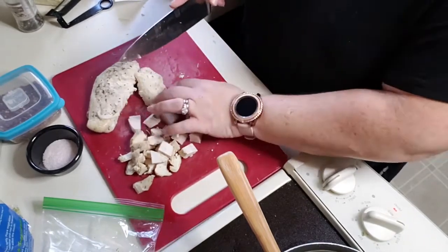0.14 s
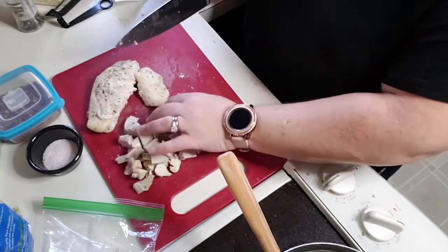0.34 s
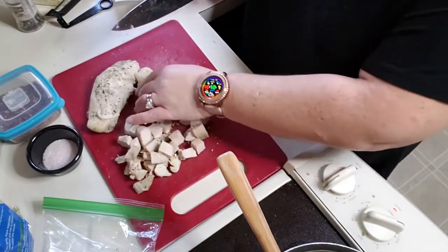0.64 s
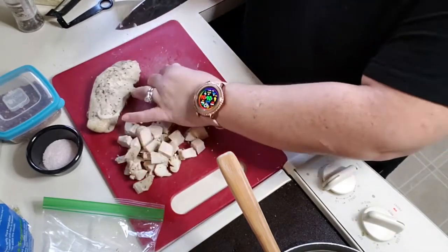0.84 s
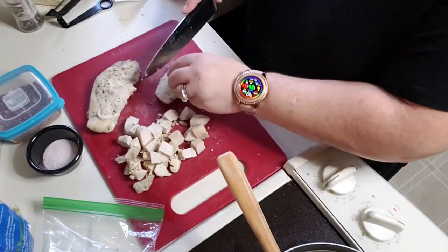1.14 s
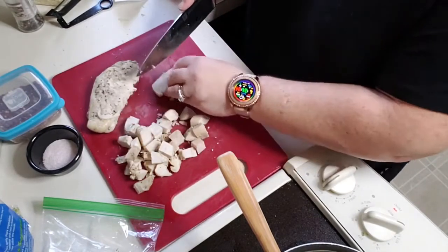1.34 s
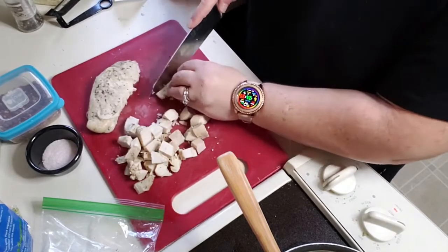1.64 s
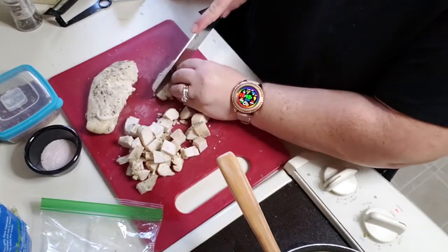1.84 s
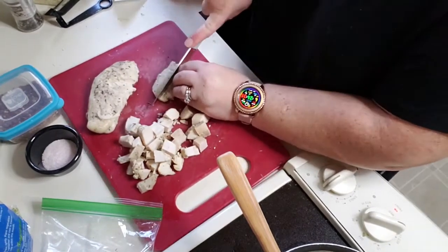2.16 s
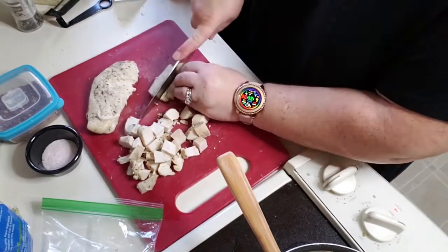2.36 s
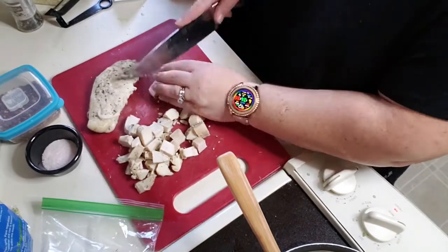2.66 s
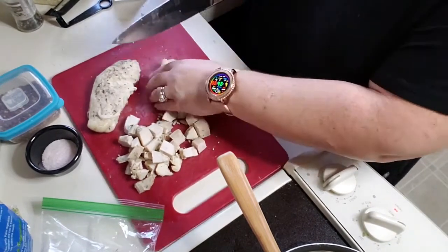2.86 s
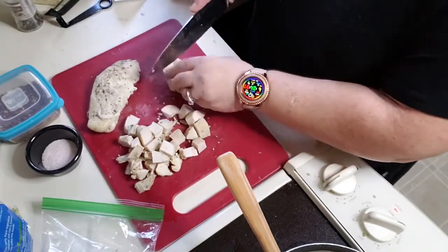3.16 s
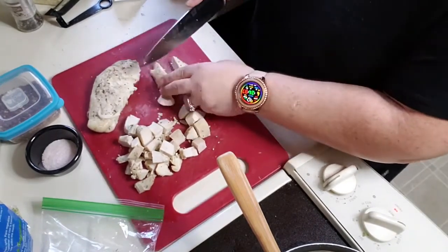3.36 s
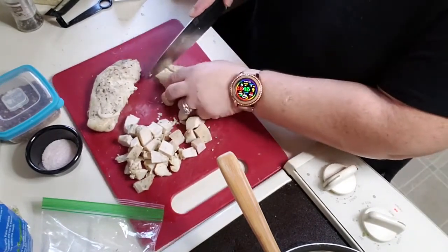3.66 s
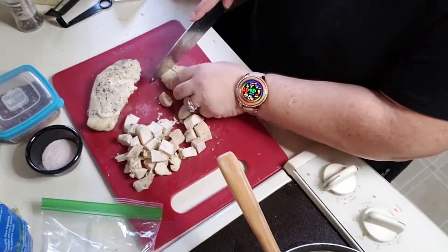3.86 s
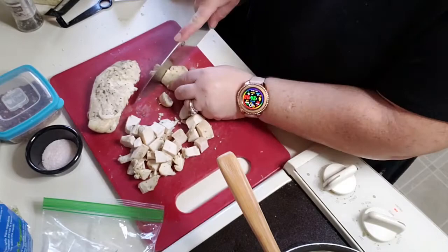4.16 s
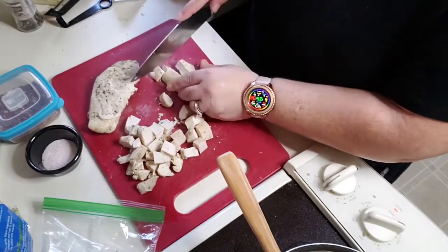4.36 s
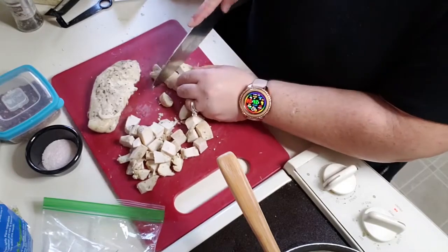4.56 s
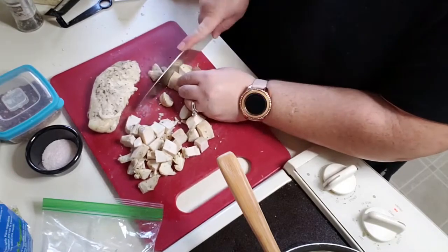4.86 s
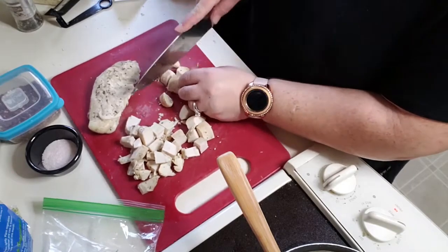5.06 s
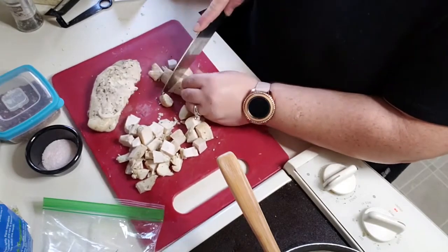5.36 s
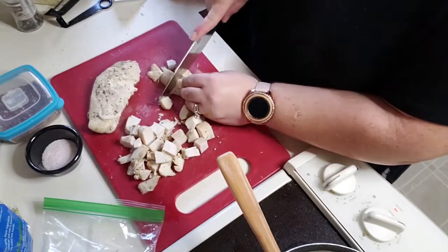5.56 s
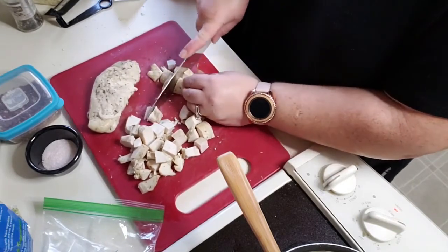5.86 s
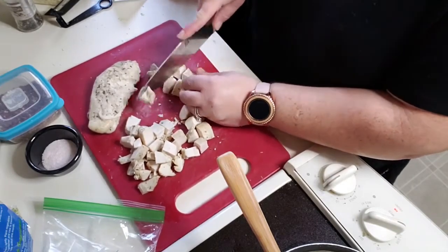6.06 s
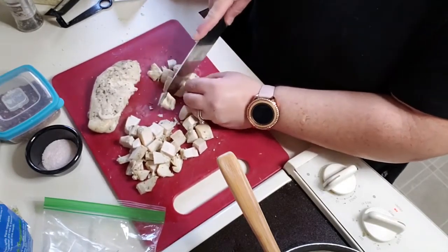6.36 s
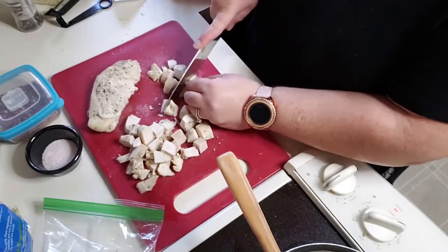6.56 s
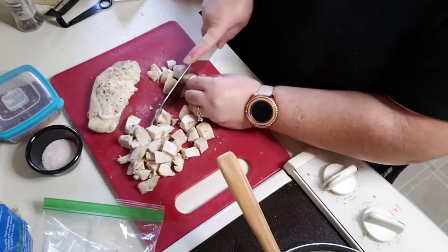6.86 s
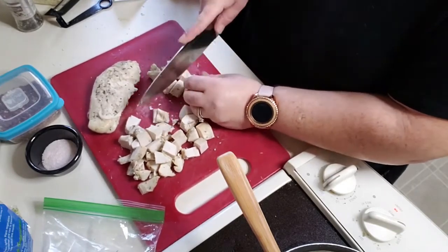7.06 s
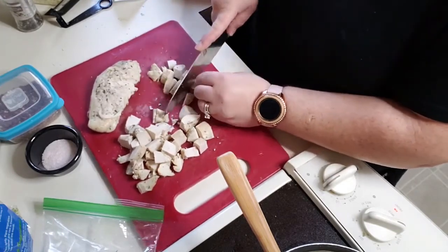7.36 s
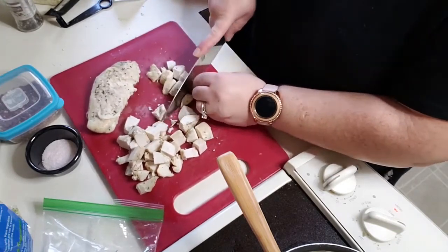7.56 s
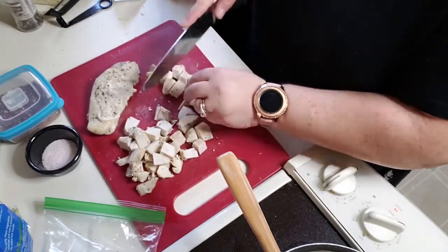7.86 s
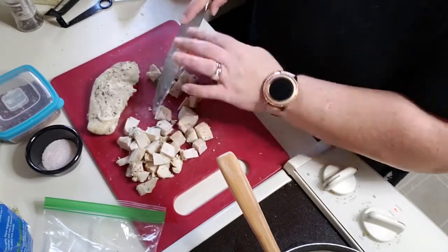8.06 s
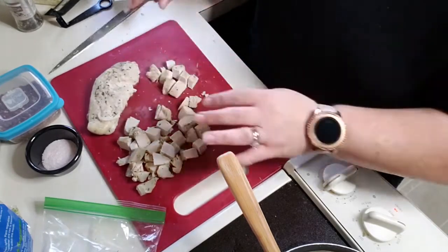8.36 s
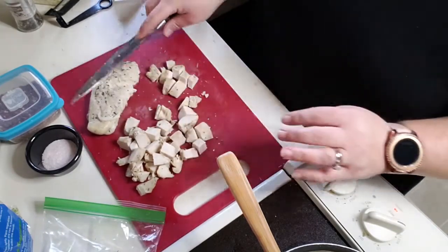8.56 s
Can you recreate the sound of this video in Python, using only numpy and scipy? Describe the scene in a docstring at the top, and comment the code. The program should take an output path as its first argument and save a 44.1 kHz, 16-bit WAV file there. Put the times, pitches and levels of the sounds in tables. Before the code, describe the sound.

A small, hard-walled kitchen heard close to the board, with soft air noise, a weak wavering fridge hum and faint crickets chirping roughly every 0.7 seconds. First come moist rubs and tiny pops; a light tap at 0.6 leads into a stuttering fingertip shove until 0.9. Chopping begins around 1.6 with moderate knocks at 1.7 and 1.8, then a strong hollow one at 2.2 with a wet slide, and lighter blows to 2.7. Soft handling and sticky ticks follow. The loudest, crispest double knock lands at 4.0. Another firm knock comes at 4.7, then a quick cluster of faint taps around 5.2 and medium blows at 5.5 and 5.65. After a pause, a knock at 6.6, scrapes near 7.1, a heavy thudding chop at 7.4 and softer ones at 7.6. Quiet sliding resumes at 8.3; at 8.6 the knife is laid down, lightly clattering with a brief dull metallic ring.

```python
"""A chef's knife chops cooked chicken on a plastic board lying on a kitchen counter, close under a phone. Blows
are damped board modes with a short knock and an edge crack; at the end the knife is laid down, ringing. Hands
lean on the board, blade and fingers slide over it and wet meat pops: grainy noise and tiny damped tones. A
small hard room answers with a noise tail; behind lie air noise, a wavering fridge hum of sines and two crickets
beyond the window, made of short tones."""
import sys
import numpy as np
from scipy import signal
from scipy.fft import rfft, irfft
from scipy.io import wavfile
from scipy.ndimage import uniform_filter1d

SR = 44100
rng = np.random.default_rng(int(sys.argv[2]) if len(sys.argv) > 2 else 0)


def wav_out(sig):
    """Save sig, one row per channel (or a flat mono array), as 16-bit PCM at SR to the path in sys.argv[1]."""
    wavfile.write(sys.argv[1], SR, np.round(np.clip(np.atleast_2d(sig).T, -1, 1) * 32767).astype(np.int16))


def voltage_ratio(decibels):
    """Convert decibels (scalar or array-like) to amplitude ratios, 20 dB per decade."""
    exponent = np.asarray(decibels, float) / 20
    return 10 ** exponent


N = 384111
TIME = np.arange(N) / SR

# blade meets board; levels are relative, the crack's is over the knock:
# (t/s, knock level/dB, landing spot f/Hz, weight on the counter level/dB, edge crack level/dB)
BLOWS = [(0.643, -58, 1380, -40, -25), (1.557, -73, 980, -46, -16), (1.682, -29.5, 1250, -37.5, -17.5),
         (1.832, -36, 1240, -43, -32), (2.205, -10, 1110, -38, -24.5), (2.303, -36, 1200, -40, -26),
         (2.627, -58, 1130, -34, -7), (2.671, -35.5, 1250, -48.5, -18.5), (3.526, -78, 1085, -52.5, 7),
         (3.839, -42.5, 1340, -80, -9), (3.966, -5, 1330, -35.5, -7), (4.009, -21, 926, -35, -15),
         (4.5, -68, 1410, -52.5, -11.5), (4.586, -39, 1355, -47, -30), (4.694, -15.5, 1388, -39, -17.5),
         (4.857, -34.5, 1480, -59.5, -11.5), (5.163, -55.5, 1346, -44, -12), (5.222, -59.5, 1316, -41, -25),
         (5.249, -59, 1330, -40.5, -30), (5.287, -52.5, 1320, -54.5, -29), (5.47, -34, 1250, -39.5, -19.5),
         (5.653, -30, 1100, -44, -33), (6.59, -34, 1200, -35.5, -22), (6.872, -60, 1080, -73, -11.5),
         (7.382, -12.5, 974, -29, -28), (7.606, -38, 1104, -49.5, -33.5), (7.668, -44.5, 970, -42.5, -24),
         (8.576, -63, 1400, -44.5, -3)]
# modes of the board on the counter: (f/Hz, level/dB, t60/s)
BOARD_MODES = [(57, -12, 0.14), (133.2, -4.5, 0.17), (171.7, -7, 0.11), (231, -7.5, 0.072),
               (298.6, -1.5, 0.089), (383, -12, 0.078), (470.2, -9.5, 0.034), (570, -11.5, 0.042),
               (775.4, 5, 0.068), (831, -3.5, 0.023), (934.3, 0, 0.011), (1080, 2.5, 0.021),
               (1200, 0.5, 0.032), (1390, 12.5, 0.03), (1425, 9, 0.025), (1693, 0.5, .03),
               (1810, 1.5, 0.043), (2000, -5, 0.036), (2220, -6.5, 0.13), (2800, -4, 0.034),
               (3440, -2, 0.005)]


def table(hz, rows):
    """Read (f/Hz, value) rows on a log-frequency axis."""
    f, v = np.transpose(rows)
    return np.interp(np.log(np.maximum(hz, 1)), np.log(f), v)


def shape(x, gain):
    """Filter by a gain that is a function of frequency."""
    n = x.shape[-1]
    return irfft(rfft(x) * gain(np.arange(n // 2 + 1) * SR / n), n)


def unit(x):
    """Scale to rms 1."""
    return x / np.sqrt(np.mean(x ** 2))


def add(out, s, x):
    """Mix x into out from time s."""
    i = max(int(s * SR), 0)
    out[i:i + len(x)] += x[:N - i]


def wide(n):
    """Two-channel noise, alike in the bass and unlike in the treble."""
    # strength of the left-right difference against the common part: (f/Hz, gain)
    side_gain = [(60, .25), (300, .3), (600, .9), (1200, .6), (2000, .95), (8000, .95)]
    mid, side = rng.standard_normal((2, n))
    side = shape(side, lambda f: table(f, side_gain))
    return mid + side * np.array([[1], [-1]])


def ring(hz, gain, t60, length=.4, rise=0.5):
    """Damped sines; each takes part of its own cycle to build, so the lows come late."""
    t = np.arange(int(length * SR)) / SR
    cycles = hz[:, None] * t
    build = 1 - np.exp(-cycles / rise)
    decay = np.exp(-np.log(1000) * t / t60[:, None])
    return gain @ (build * decay * np.sin(2 * np.pi * cycles))


def resonate(x, modes, widen):
    """Steady excitation through modes broadened widen-fold, rms 1."""
    return unit(shape(x, lambda f: sum(voltage_ratio(db) / (1 + ((f - hz) * t60 / widen) ** 2) for hz, db, t60 in modes)))


def grit(rate, spread_db):
    """Two-channel noise whose strength jumps in short uneven grains, as friction catches and slips."""
    grain = int(SR / rate)
    jumps = voltage_ratio(spread_db * np.clip(rng.standard_normal(N // grain + 1), -2, 2))
    strength = uniform_filter1d(np.repeat(jumps, grain)[:N], grain)
    return unit(wide(N) * strength)


def chops():
    """Every blow rings the same modes; where the blade lands decides the knock and which modes speak."""
    # edge on plastic: (f/Hz, level/dB)
    crack_spectrum = [(300, -22.5), (600, -8), (1500, -3), (2000, 4), (2800, 1), (3600, -3), (5000, -9.5),
                      (6800, -9), (8000, -33.5), (16000, -36.5)]
    thud_share, thud_lift_db = 0.58, 2  # the thud lies between knock and weight: share of the knock's dB, lift
    swings_at_1k, swings_per_octave = 0.6, 0.54  # spread of the knock in swings; higher spots swing more often
    body, knock, slap = np.zeros((3, N))
    hz, db, t60 = np.transpose(BOARD_MODES)
    sign = (-1) ** np.arange(len(hz))  # neighbouring modes bend opposite ways
    t = np.arange(SR // 20) / SR
    for s, peak_db, spot_hz, weight_db, crack_db in BLOWS:
        nudge, tune = rng.standard_normal((2, len(hz)))
        # counter modes follow the weight, thud modes the blend, higher modes the nearness of the spot
        near_db = -8 * np.abs(np.log2(hz / spot_hz))
        thud_db = thud_share * peak_db + (1 - thud_share) * weight_db + thud_lift_db
        zone_db = np.select([hz < 200, hz < 650], [weight_db + 6.5, thud_db], peak_db + near_db - 17.5)
        add(body, s, ring(hz * (1 + 0.012 * tune), sign * voltage_ratio(db + zone_db + 3.4 * nudge), t60))
        # the patch under the edge swings a few times and is still
        swings = 0.91 * spot_hz * t
        swing = np.sin(2 * np.pi * swings)
        spread = swings_at_1k + swings_per_octave * np.log2(spot_hz / 1000)
        add(knock, s, voltage_ratio(peak_db + 1.0) * np.exp(-((swings - 2.2) / spread) ** 2) * swing)
        # off to the sides the knock is a shorter, broader slap
        add(slap, s, voltage_ratio(peak_db - 1) * np.exp(-((swings - 2) / 0.4) ** 2) * swing)
        crack = unit(shape(rng.standard_normal(len(t)), lambda f: voltage_ratio(table(f, crack_spectrum))))
        crack = crack * np.exp(-t / 0.001) * (1 - np.exp(-t / 0.00022))
        add(body, s, voltage_ratio(peak_db + crack_db + 8.5) * crack)
    return body, knock, slap


def laid_knife():
    """Steel and handle ring on as the knife is laid down, struck by a brief noisy chatter as it settles."""
    # knife laid down on the counter: (t/s, relative level/dB)
    landings = [(8.619, -30)]
    # what the laid knife rings with: (f/Hz, level/dB, t60/s)
    knife_modes = [(348, -19, 0.14), (853, -12.5, 0.19), (947.4, -8.5, 0.11), (1386, -15, .15),
                   (1665, 2.5, 0.079), (1870, -15, 0.059), (2080, -13, 0.12), (2160, -7, 0.08),
                   (2430, -34, 0.092), (2800, -16, 0.063), (3720, -20, 0.046), (4650, -28, 0.04),
                   (5510, -34, 0.1)]
    out = np.zeros(N)
    hz, db, t60 = np.transpose(knife_modes)
    t = np.arange(int(.03 * SR)) / SR
    for s, level_db in landings:
        chatter = rng.standard_normal(len(t)) * np.exp(-t / 0.0015)
        chatter = chatter / np.sqrt(np.sum(chatter ** 2))
        add(out, s, np.convolve(ring(hz, voltage_ratio(level_db + db + 4), t60, .12), chatter))
    return out


def bite():
    """Drag gain growing up to each blow: the edge crunches through the last meat before it lands."""
    rise_s, under_weight_db = 0.0089, -26
    out = np.zeros(N)
    t = np.arange(-SR // 10, 0) / SR
    for s, _, _, weight_db, _ in BLOWS:
        add(out, s + t[0], voltage_ratio(weight_db + under_weight_db) * np.exp(t / rise_s))
    return out


def strokes(column):
    """Gain of one rubbing layer: each slide swells to its peak and dies away."""
    # blade or fingers slide, relative levels:
    # (start t/s, length t/s, drag on the board level/dB, scuff level/dB, wet hiss level/dB)
    slides = [(0.07, 0.2, -74.5, -79, -71), (0.365, 0.055, -75, -93.5, -72),
              (0.44, 0.23, -79.5, -83, -70.5), (0.691, 0.22, -69.5, -77, -77),
              (1.497, 0.089, -103, -98, -68.5), (2.163, 0.17, -57.5, -78, -55), (2.37, 0.21, -72, -99, -71),
              (2.61, 0.13, -72, -88, -68), (2.906, 0.3, -78.5, -75.5, -65),
              (3.354, 0.15, -92.5, -79.5, -69.5), (3.557, 0.087, -89, -76, -67.5),
              (3.689, 0.118, -87.5, -76, -73.5), (3.813, 0.11, -78, -84, -61),
              (4.715, 0.13, -62, -59.5, -62.5), (5.157, 0.2, -71, -93, -95.5),
              (5.616, 0.13, -63.5, -84.5, -66.5), (5.734, 0.14, -73, -82.5, -76),
              (6.542, 0.2, -60.5, -69, -63.5), (6.714, 0.081, -72, -80, -73),
              (6.858, 0.066, -82.5, -84.5, -70), (7.082, 0.15, -67, -62, -63.5),
              (7.33, 0.2, -62, -79, -71.5), (7.606, 0.061, -59, -89, -78.5), (8.347, 0.15, -82, -94, -75.5),
              (8.508, 0.22, -66.5, -61, -71)]
    peak_at = 0.48  # share of a slide spent swelling
    out = np.zeros(N)
    for row in slides:
        u = np.linspace(0, 1, int(row[1] * SR))
        swell = np.sin(np.pi / 2 * np.interp(u, [0, peak_at, 1], [0, 1, 0]))
        add(out, row[0], voltage_ratio(row[column]) * swell)
    return out


def handling():
    """Leaning and sliding excite the same board modes softly; wet meat hisses along the blade."""
    # hands lean on the board, relative levels: (t/s, counter sway level/dB, board level/dB)
    lean_curve = [(0.0, -69, -65.5), (0.36, -66, -64), (1.09, -75, -66.5), (1.6, -74, -71),
                  (1.75, -69, -51), (2.13, -80, -70), (2.42, -60.5, -68.5), (3.01, -82.5, -66.5),
                  (3.98, -69.5, -61), (4.46, -80.5, -72.5), (4.7, -70, -57), (5.04, -81, -74),
                  (5.46, -69.5, -66), (6.14, -83, -73), (6.67, -73, -60), (7.2, -78, -65.5),
                  (7.57, -62, -60), (7.86, -74.5, -68.5), (8.51, -76, -71.5), (8.71, -54.5, -56)]
    # wet hiss: (f/Hz, level per Hz/dB)
    hiss_spectrum = [(1760, -38), (3000, -10.5), (5440, -5), (5960, -4), (7510, -5.5), (10500, -11.5),
                     (13700, -7.5), (15700, -9.5), (16200, -30)]
    rock_db = 7.5  # a drag also rocks the board: lift of the low modes
    s, sway_db, board_db = np.transpose(lean_curve)
    sway = voltage_ratio(np.interp(TIME, s, sway_db + 6)) * resonate(grit(40, 1.4), BOARD_MODES[:1], 4.5)
    boom = voltage_ratio(np.interp(TIME, s, board_db)) * resonate(grit(40, 1.4), BOARD_MODES[1:3], 4.5)
    thud = voltage_ratio(np.interp(TIME, s, board_db - 2.5)) * resonate(grit(40, 1.4), BOARD_MODES[3:6], 4.5)
    drag_gain = strokes(column=2) + bite()
    rock = voltage_ratio(rock_db) * drag_gain * resonate(grit(60, 5), BOARD_MODES[1:8], 6.0)
    drag = drag_gain * resonate(grit(120, 5), BOARD_MODES[6:17], 23.0)
    scuff = strokes(column=3) * resonate(grit(250, 2.6), BOARD_MODES[16:], 14.0)
    wet = unit(shape(grit(110, 3.0), lambda f: voltage_ratio(table(f, hiss_spectrum))))
    return sway + boom + thud + rock + drag + scuff + strokes(column=4) * wet


def shove():
    """A fingertip shoves pieces along: wet skin stutters over plastic and sings in a few broad bands."""
    # the shove in time: (start t/s, peak t/s, end t/s)
    shove_times = (.66, .73, .92)
    # bands it sings in: (f/Hz, width f/Hz, level/dB)
    song_bands = [(1250, 270, 0.5), (1475, 210, 5), (2810, 590, -5.5), (5340, 1900, -15)]

    def bands(f):
        return sum(voltage_ratio(db) / (1 + (2 * (f - hz) / width) ** 2) for hz, width, db in song_bands)

    swell = np.interp(TIME, shove_times, [0, 1, 0]) ** 2
    return voltage_ratio(-50.5) * swell * unit(shape(grit(91.7, 2.9), bands))


def blade():
    """Something brushes the flat of the blade: noise through the steel's modes sings thinly."""
    # brushes: (start t/s, length t/s, level/dB)
    wipes = [(2.621, 0.12, -61.5)]
    # steel: (f/Hz, level/dB, t60/s before broadening)
    steel_modes = [(5400, -19, 0.091), (6260, -1, 0.17), (7470, -15, 0.094), (11100, -15, .08),
                   (13000, -13, .08), (14500, -7, .06)]
    gain = np.zeros(N)
    for s, length, db in wipes:
        add(gain, s, voltage_ratio(db) * np.hanning(int(length * SR)))
    return gain * resonate(rng.standard_normal(N), steel_modes, 1.6)


def ticks():
    """Moist meat lets go of blade or finger: tiny pops, each of two quickly damped tones."""
    # pops: (t/s, relative level/dB, lower tone f/Hz)
    pops = [(0.2416, -44.5, 4000), (0.2992, -43.5, 3870), (0.371, -51, 7460), (1.44, -47, 4320),
            (1.516, -58, 4450), (2.4084, -50.5, 7450), (3.122, -46.5, 3330), (3.375, -50, 4670),
            (3.583, -40, 4630), (3.6279, -46, 4540), (3.7072, -41.5, 4400), (4.3422, -62.5, 3254),
            (4.389, -52.5, 3000), (4.470, -57, 3770), (6.4981, -47, 4440), (8.0243, -51.5, 9910),
            (8.19, -49.5, 4230), (8.54, -45.5, 6730)]
    out = np.zeros(N)
    for s, level_db, hz in pops:
        gain = voltage_ratio(level_db - np.array([3, 8]))
        add(out, s, ring(hz * np.array([1, 1.4]), gain, np.array([.006, .004]), .02))
    return out


def room(x, delay=0.0006):
    """Diffuse tail with its own decay and strength in each octave."""
    # the room: (f/Hz, t60/s, relative level/dB)
    room_rows = np.array([(100, 0.3, -4), (392.4, 0.27, 4.5), (1200, 0.36, -5.5), (2470, 0.2, -2),
                          (4800, 0.45, -2), (9900, 0.081, -1)])
    late_db, late_stretch = -26.5, 2.2  # slower decay from the next room: level, t60 as a multiple
    t = np.arange(SR // 2) / SR
    noise, tail = wide(len(t)), 0
    for hz in 60 * 2. ** np.arange(9):
        octaves_off = lambda f: np.clip(np.log2(np.maximum(f, 1) / hz), -1, 1)
        band = shape(noise, lambda f: np.cos(np.pi / 2 * octaves_off(f)) ** 2)
        fall = np.exp(-np.log(1000) * t / table(hz, room_rows[:, :2]))
        late = voltage_ratio(late_db) * fall ** (1 / late_stretch)
        tail = tail + voltage_ratio(table(hz, room_rows[:, ::2])) * band * (fall + late)
    # silent for the delay (s), then fading in over as long again
    tail = tail * np.clip(t / delay - 1, 0, 1)
    tail = tail / np.sqrt(np.sum(tail ** 2, axis=1, keepdims=True))
    return signal.fftconvolve(x[None], tail, axes=1)[:, :N]


def crickets():
    """A near cricket chirps in wing strokes whose tone sinks as the file runs out; a far one trills steadily."""
    # near cricket: (t/s, relative level/dB)
    chirps = [(.092, -70), (0.776, -70), (1.373, -71), (2.12, -72), (2.805, -70), (3.491, -73),
              (4.491, -76), (5.077, -74.5), (5.68, -73), (6.319, -75.5), (7.023, -70.5), (7.689, -71),
              (8.26, -71.5)]
    # wing strokes of a chirp: (t after its start/s, relative level/dB)
    wing_strokes = [(0, -3.5), (0.046, 0), (.092, 0), (.14, -11.5)]
    # far cricket: (start t/s, length t/s, relative level/dB)
    trills = [(0, 0.12, -84), (.45, 0.22, -84), (2.94, .14, -85), (3.42, .1, -85)]
    out = np.zeros(N)
    t = np.arange(int(0.041 * SR)) / SR
    pitch = 4720 - 400 * (t / t[-1]) ** 1.7  # Hz
    envelope = np.sin(np.pi * t / t[-1]) ** 0.34 * np.exp(-t / .045)
    stroke = envelope * np.sin(2 * np.pi * np.cumsum(pitch) / SR)
    for s, db in chirps:
        for after, stroke_db in wing_strokes:
            level = voltage_ratio(db + stroke_db + 1.1 * rng.standard_normal())
            flutter = uniform_filter1d(rng.standard_normal(len(t)), 60) * 60 ** .5
            add(out, s + after, level * stroke * (1 + 0.47 * flutter))
    for s, length, db in trills:
        t = np.arange(int(length * SR)) / SR
        wander = 0.028 * np.cumsum(rng.standard_normal(len(t)))  # phase in radians
        tone = np.sin(2 * np.pi * 5480 * t + wander)
        add(out, s, voltage_ratio(db) * np.sin(np.pi * t / length) ** .4 * tone)
    return out


def kitchen():
    """Room air as drifting noise in two ranges, and a fridge whose lines waver in phase."""
    # drift of the background: (t/s, middle level/dB, treble level/dB)
    swell_curve = [(0.0, -70.5, -76.5), (1.6, -75.5, -75.5), (2.42, -72, -72.5), (3.86, -75.5, -78),
                   (4.4, -78, -80), (6.2, -77.5, -78.5), (7.0, -71, -74), (7.8, -73.5, -74.5),
                   (8.71, -77.5, -76)]
    # room air: (f/Hz, level per Hz/dB)
    air_spectrum = [(240, -37), (400, -10.5), (705, -3.5), (1100, -5), (1210, -9), (1380, -6.5),
                    (1820, -16), (3470, -18), (5590, -24), (7250, -13.5), (9120, -27), (13200, -16.5),
                    (15700, -22), (16200, -48.5)]
    # fridge lines: (f/Hz, level over the middle of the background/dB)
    hum_lines = [(134.6, -9), (269.2, 5.5), (301.5, -13), (705.2, -7), (1087, -6.5), (1357, -12)]
    s, middle_db, treble_db = np.transpose(swell_curve)
    low_share = lambda f: 1 / (1 + (f / 2200) ** 4)
    middle = unit(shape(wide(N), lambda f: voltage_ratio(table(f, air_spectrum)) * low_share(f)))
    treble = unit(shape(wide(N), lambda f: voltage_ratio(table(f, air_spectrum)) * (1 - low_share(f))))
    hz, db = np.transpose(hum_lines)
    wobble = np.cumsum(rng.standard_normal((len(hz), N)), axis=1) * 0.018
    hum = voltage_ratio(db) @ np.sin(2 * np.pi * hz[:, None] * TIME + wobble)
    middle_gain = voltage_ratio(np.interp(TIME, s, middle_db))
    treble_gain = voltage_ratio(np.interp(TIME, s, treble_db))
    return middle_gain * (middle + hum) + treble_gain * treble


def scene():
    """A blow reaches the right port first; the phone's body shades each port in its own way."""
    # left port over right for the sounds at the board: (f/Hz, level/dB)
    port_tilt = [(60, 2), (130, 3), (280, 0.4), (600, 3.5), (1300, 5.5), (2400, 5), (4000, 6), (8000, 7),
                 (12000, -5.5)]
    body, knock, slap = chops()
    hits = body + laid_knife() + ticks()
    # the knock beams up from the board, so the walls get less of it
    walls = voltage_ratio(-5.0) * room(hits + voltage_ratio(-8.5) * knock + slap)
    direct = np.array([np.roll(hits + knock, 4), hits + knock])  # left lags by 4 samples
    ports = direct + walls + handling() + shove() + blade()
    side = np.array([[.5], [-.5]])
    board = shape(ports, lambda f: voltage_ratio(side * table(f, port_tilt)))
    # the crickets are heard only as the walls smear them
    return board + voltage_ratio(9) * room(crickets(), delay=0.00039) + kitchen()


def top_cut(x):
    """Nothing passes above the cut-off."""
    return signal.sosfilt(signal.butter(12, 16740, fs=SR, output="sos"), x)


def record(dry):
    """The phone drops the deepest bass, below 42 Hz."""
    high_pass = signal.butter(3, 42, "high", fs=SR, output="sos")
    mix = signal.sosfilt(high_pass, dry)
    return top_cut(mix)


dry = scene()
out = record(dry)
wav_out(out)
```